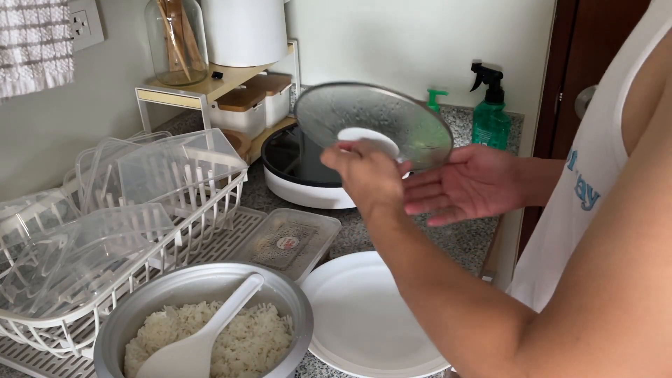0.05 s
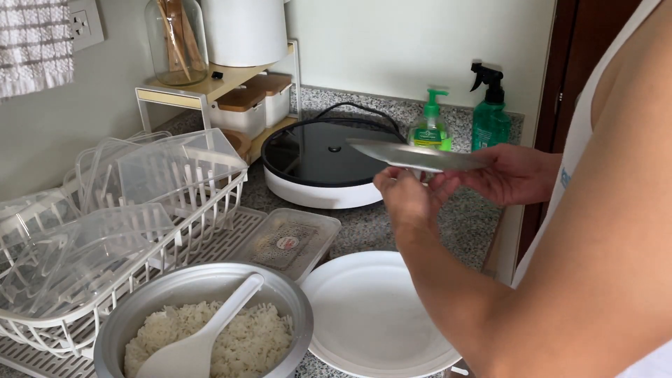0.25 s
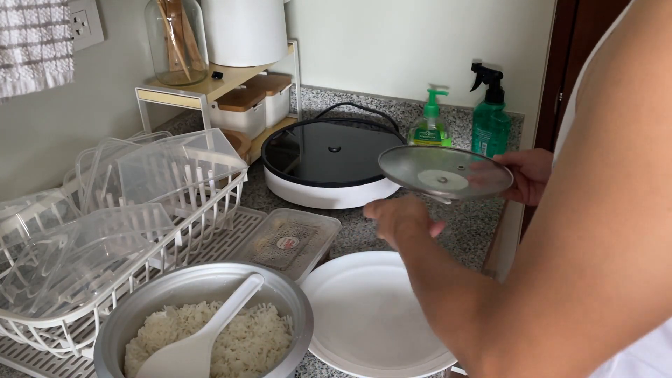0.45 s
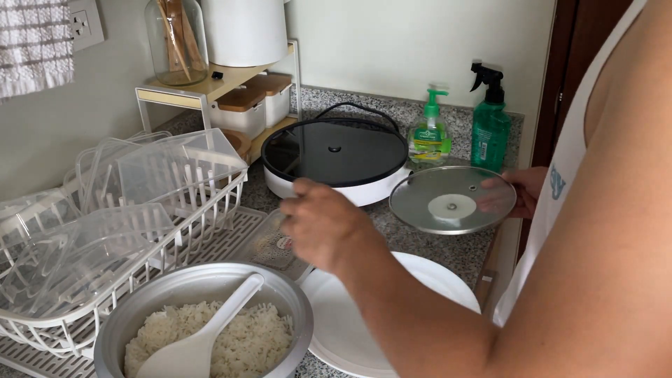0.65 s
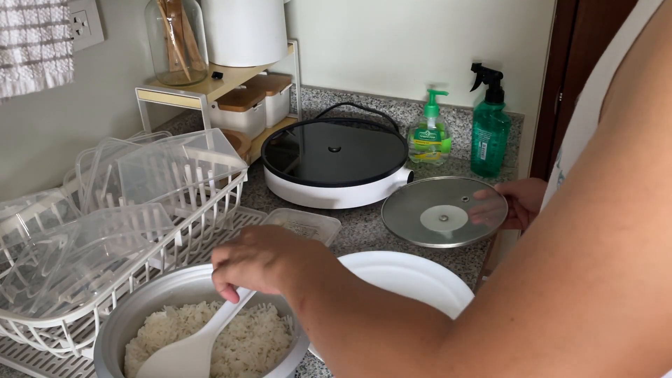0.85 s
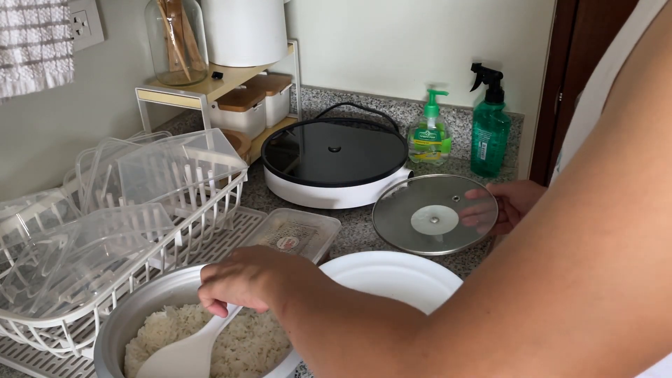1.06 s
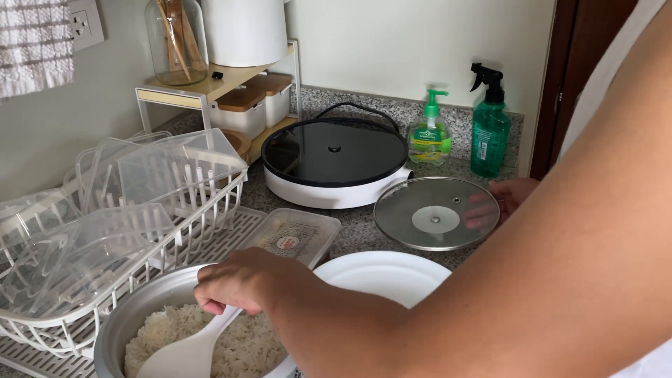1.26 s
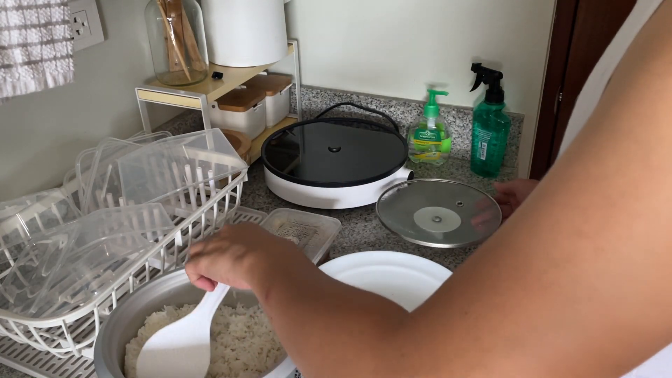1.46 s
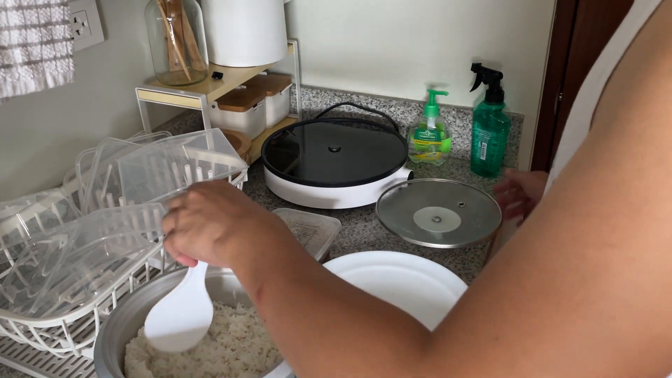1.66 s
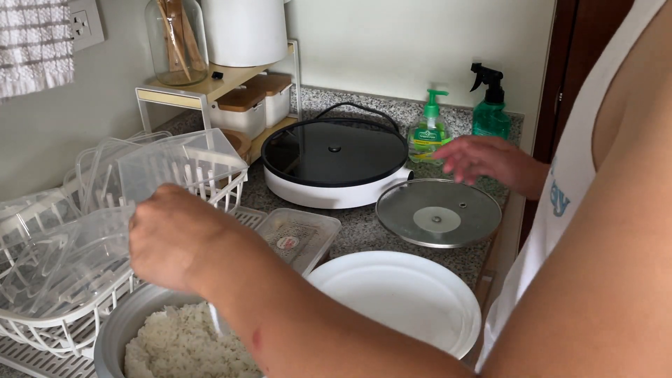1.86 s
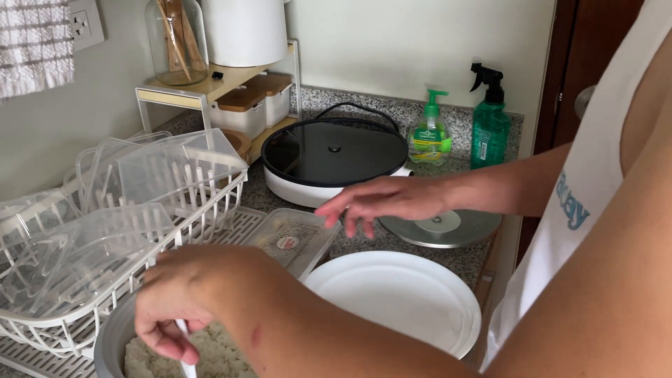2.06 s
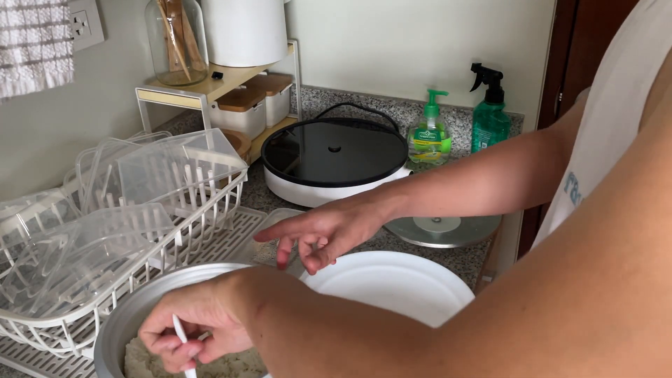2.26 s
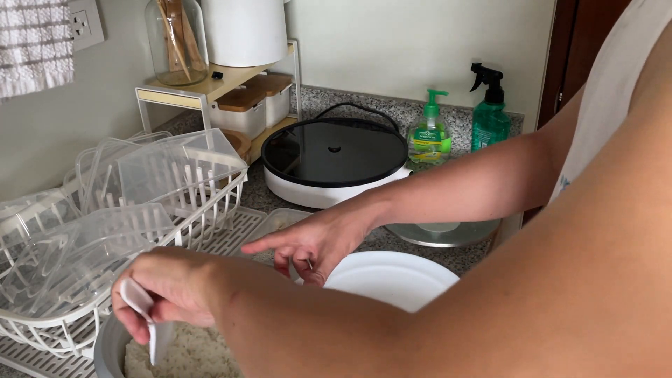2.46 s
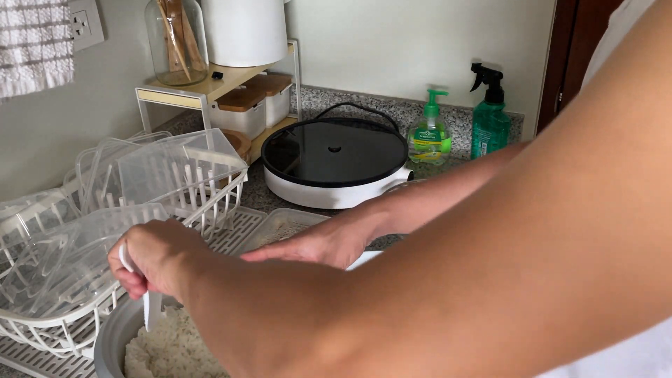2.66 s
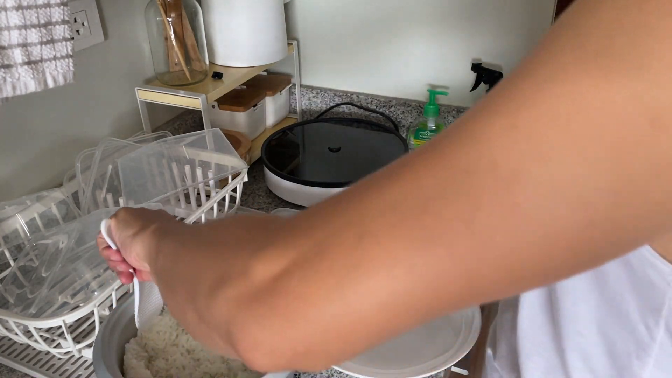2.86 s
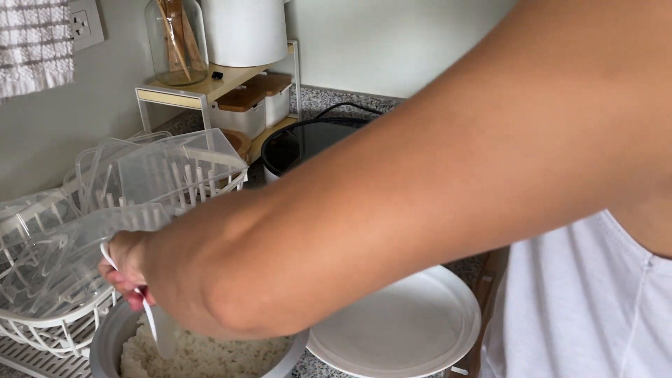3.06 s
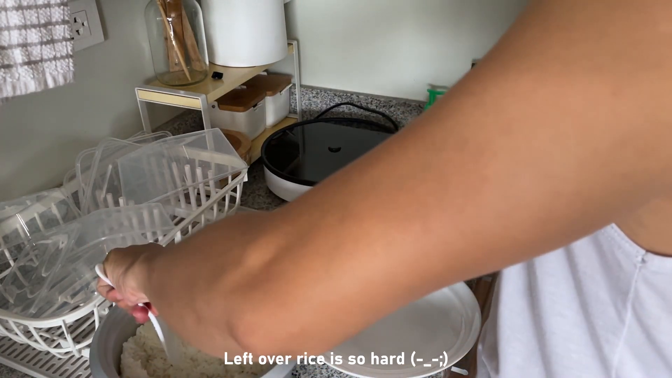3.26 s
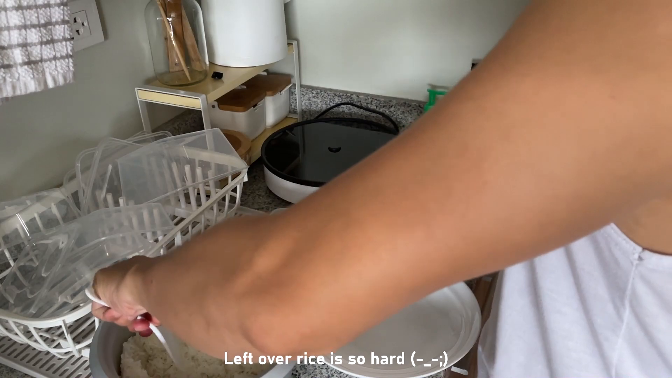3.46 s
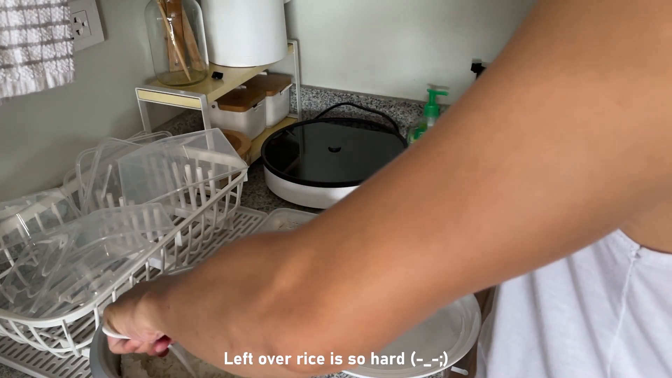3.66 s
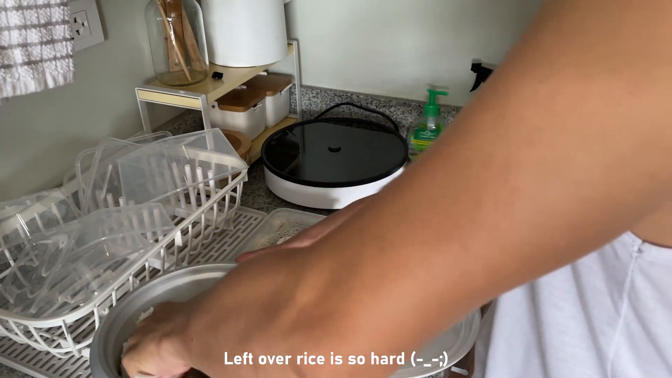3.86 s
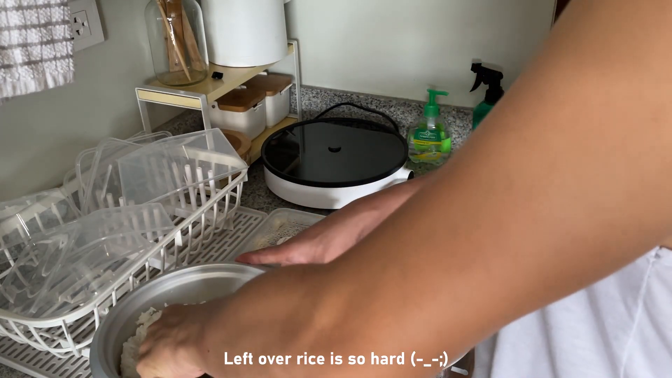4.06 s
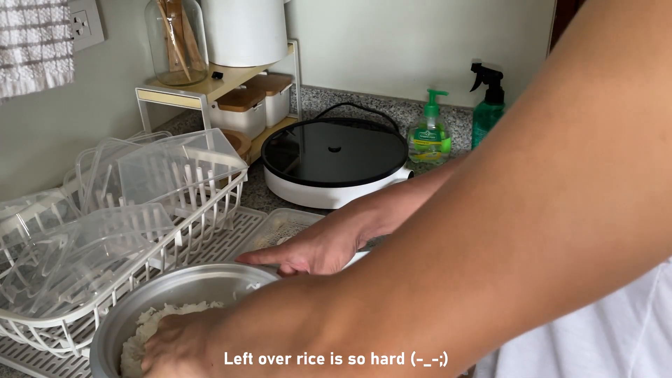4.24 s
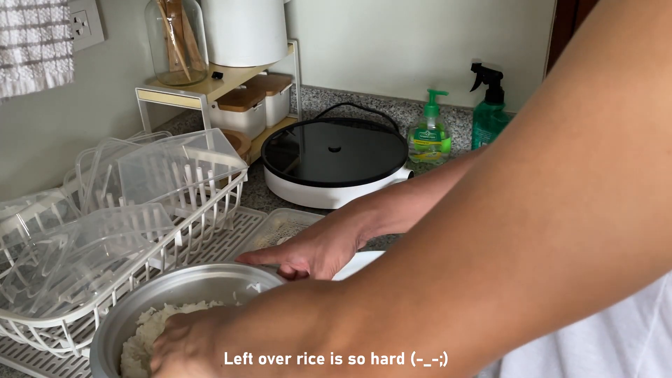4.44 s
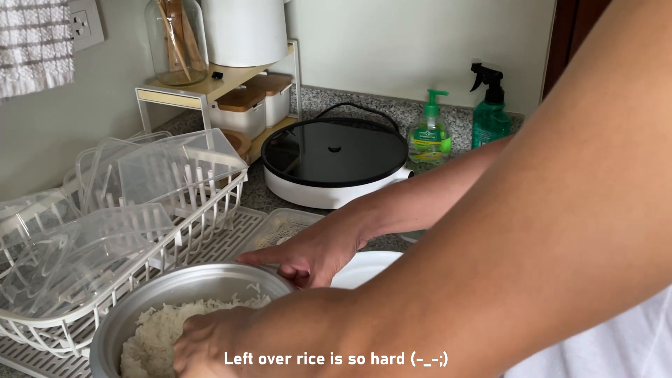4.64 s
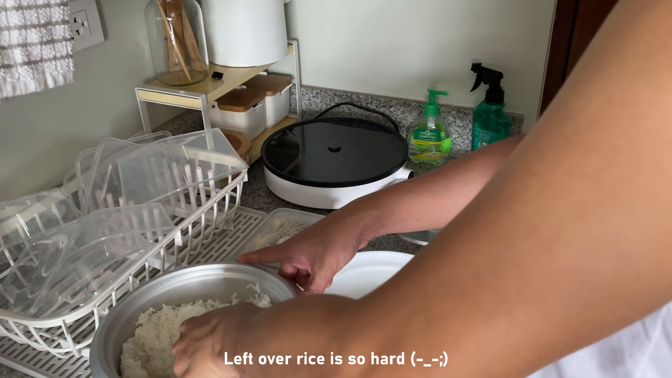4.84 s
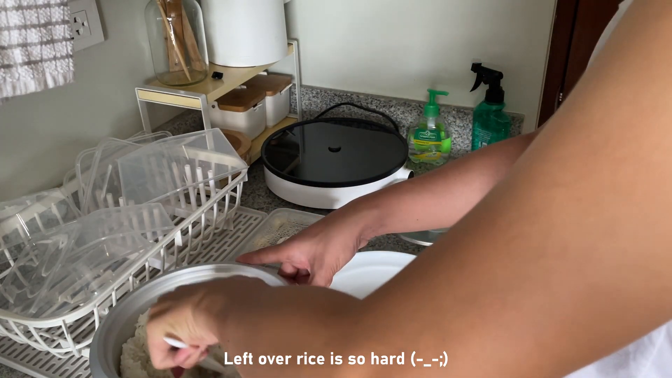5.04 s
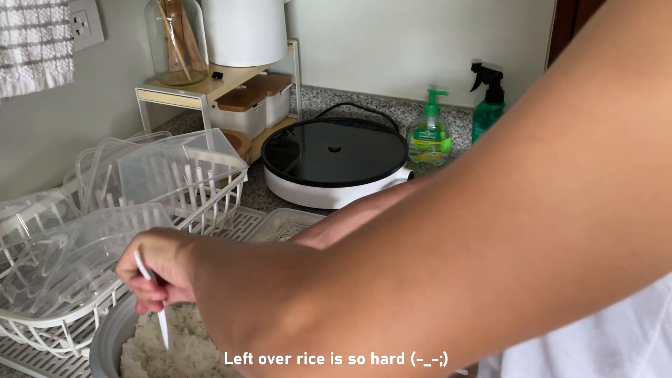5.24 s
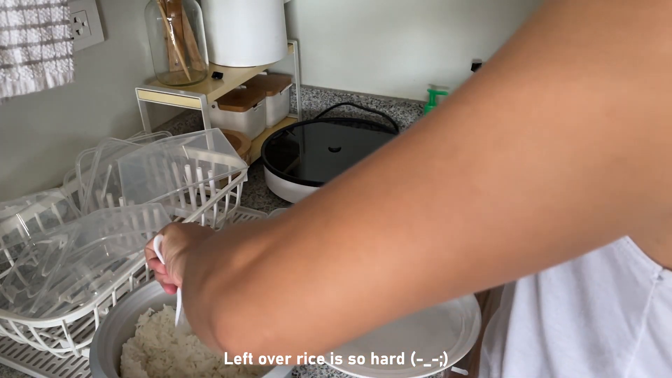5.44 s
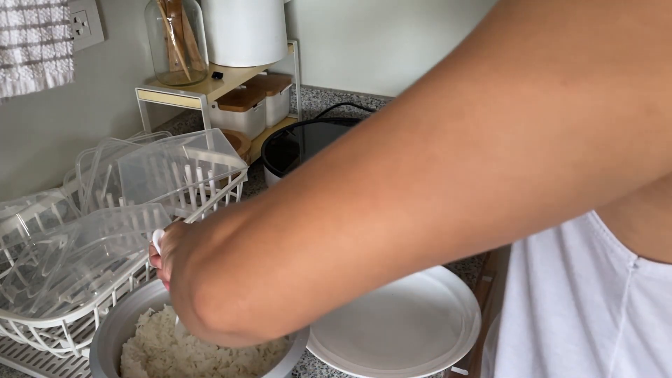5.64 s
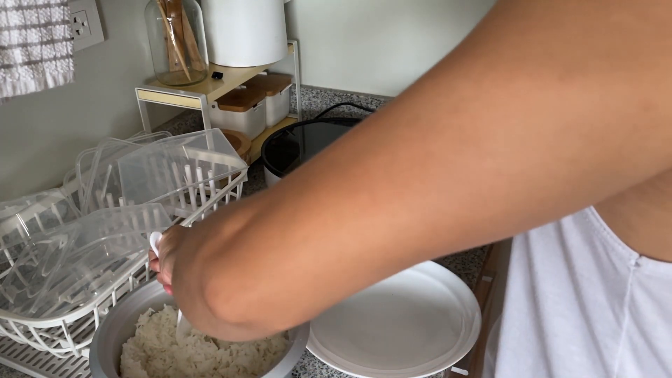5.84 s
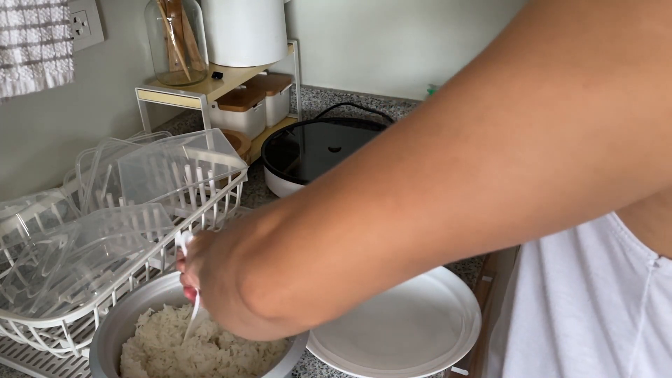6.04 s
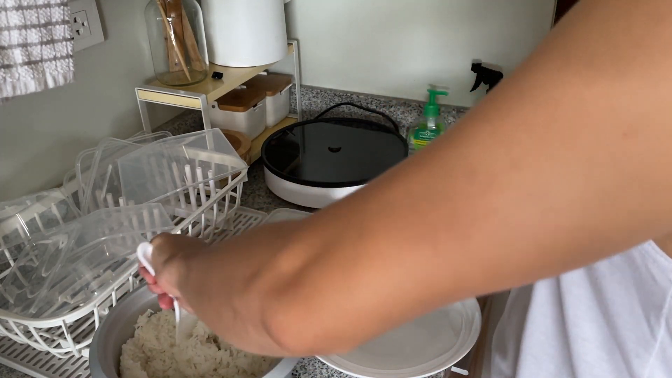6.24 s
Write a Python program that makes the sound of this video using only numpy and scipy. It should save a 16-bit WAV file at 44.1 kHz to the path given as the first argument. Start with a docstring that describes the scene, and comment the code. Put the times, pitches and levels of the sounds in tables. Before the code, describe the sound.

Small kitchen: lid clinks and rocks to rest, one hard ringing knock on a metal pot, then crackly digging through hard cooked rice with dull thuds.

```python
"""Rice pot and glass lid in a small kitchen

A glass pot lid slides through the fingers and is set down on its knob: filtered friction, clicks and ringing modes.
A plastic paddle knocks once, hard, on the metal rice pot: a chatter of noise bursts and the pot's modes.
It then digs and scrapes through stiff cooked rice: random slips, popping grains, snaps, thuds and a short groan.
Close walls answer nearly every sound, over a low steady background with faint thin tones."""
import sys
import numpy as np
from scipy import signal
from scipy.fft import rfft, irfft, next_fast_len
from scipy.io import wavfile
from scipy.ndimage import map_coordinates

SR = 44100
rng = np.random.default_rng(int(sys.argv[2]) if len(sys.argv) > 2 else 0)


def transcribe(u):
    """Save the signal u as a 16-bit wav file named by the first command-line argument.

    u: samples, shape (n,) or (channels, n), limited to [-1, 1]; the rate is SR.
    q: integer samples, one column per channel.
    """
    v = np.clip(np.atleast_2d(u).T, -1, 1)
    q = np.round(v * 32767).astype(np.int16)
    wavfile.write(sys.argv[1], SR, q)


N = 277830
NOW = np.arange(N) / SR  # s
AGE = np.arange(SR) / SR  # s since a blow

# Modes of the metal pot. Each row: frequency in Hz, relative level in dB, t60 in seconds.
POT_MODES = [(431, -14, .24), (489, -13, .25), (545, -14, .22), (619, -17, .4), (700, -12, .25),
             (740, -12, .25), (773, -3, .29), (794, -8, .28), (933, -14, .3), (953, -14, .28),
             (990, -12, .3), (1034, -21, .27), (1071, -20, .27), (1140, -16, .27), (1224, -14, .25),
             (1292, 1, .31), (1294, -39, 1.5), (1352, -9, .28), (1420, -15, .25), (1534, -18, .36),
             (1612, -19, .5), (1702, -5, .33), (1718, -14, .27), (1755, -13, .27), (1842, -13, .29),
             (1890, -10, .27), (2051, -17, .29), (2116, -18, .27), (2326, -14, .43), (2342, -20, .36),
             (2482, -19, .36), (2595, -11, .2), (2643, -19, .42), (2697, -15, .26), (2923, -22, .22),
             (3070, -22, .3), (3212, -19, .32), (3295, -24, .3), (4011, -26, .29), (4247, -26, .23),
             (4538, -29, .35), (4872, -24, .42), (4915, -26, .3), (5282, -20, .24), (5518, -29, .3),
             (6185, -30, .36), (6385, -28, .31), (7075, -27, .3)]
# Spectrum of a hard, sharp contact. Each row: frequency in Hz, relative level in dB.
EDGE_COLOUR = [(1200, -7.5), (2500, -4.5), (4300, -2), (6000, 2), (7400, -2.5), (10500, -6.5),
               (12500, -15.5), (15000, -28)]
# Dull spectrum of the pot moving on the counter. Each row: frequency in Hz, relative level in dB.
POT_MOVE_COLOUR = [(50, -16), (80, 0.5), (115, 6.5), (170, 0), (270, -4.5), (370, 2.5), (470, -9),
                   (800, -46.5)]


def amp(db):
    """Decibels to gain."""
    return 10 ** (np.asarray(db) / 20)


def unit(x):
    """Scaled to rms 1."""
    return x / np.sqrt(np.mean(x ** 2) + 1e-20)


def along(points, hz):
    """(Hz, value) points read on a log frequency axis."""
    f, v = np.transpose(points)
    return np.interp(np.log(hz + 1), np.log(f + 1), v)


def wobble(rate):
    """A smooth random curve, rate knots a second."""
    coarse = NOW[::32]
    knots = rng.standard_normal(int(N * rate / SR) + 4)
    return np.interp(NOW, coarse, map_coordinates(knots, [coarse * rate]))


def add(track, s, x):
    """Mix x into the track from time s."""
    part = track[..., round(s * SR):][..., :x.shape[-1]]
    part += x[..., :part.shape[-1]]


def filtered(x, response):
    """x times a response of frequency."""
    size = 2 * next_fast_len(x.shape[-1] // 2 + 4096)
    spectrum = rfft(x, size) * response(np.fft.rfftfreq(size, 1 / SR))
    return irfft(spectrum, size)[..., :x.shape[-1]]


def coloured(x, points):
    """Causal filter with the given spectrum; white noise keeps its power."""
    def response(hz):
        # folding the cepstrum forward gives minimum phase
        cepstrum = irfft(np.log(unit(amp(along(points, hz)))))
        cepstrum[1:len(hz) - 1] *= 2
        cepstrum[len(hz):] = 0
        return np.exp(rfft(cepstrum))
    return filtered(x, response)


def swells(rows):
    """Gain over time from (peak s, rise s, fall s, dB) rows: exponential rises and falls, whose powers add."""
    t = NOW[::16]
    power = 0
    for s, rise, fall, db in rows:
        decay = np.maximum((s - t) / rise, (t - s) / fall).clip(0, 40)
        power = power + (amp(db) * np.exp(-decay)) ** 2
    return np.interp(NOW, t, np.sqrt(power))


def crack(colour, t60):
    """One contact: a dying burst, flat before colouring, with the energy of 4 ms at rms 1."""
    t = AGE[:SR // 5]
    phases = np.angle(rfft(rng.standard_normal(len(t)) * amp(-60 * t / t60)))
    burst = coloured(irfft(np.exp(1j * phases))[:len(t) // 2], colour)
    return burst / np.linalg.norm(burst) * np.sqrt(.004 * SR)


def ring(modes):
    """Modes struck at slightly random strengths, each beating as it dies and out of phase left to right."""
    beat_db = 2
    out = 0
    for hz, db, t60 in modes:
        phase = rng.uniform(0, 2 * np.pi) + np.array([[.4], [-.4]]) * rng.choice([-1, 1])
        beat_hz = rng.uniform(5, 14)
        beat = beat_db * np.sin(2 * np.pi * (beat_hz * AGE + rng.random()))
        level = amp(db + .5 * rng.standard_normal() + beat - 60 * AGE / t60)
        out = out + level * np.sin(2 * np.pi * hz * AGE + phase)
    return out * (1 - np.exp(-AGE / 0.00043))  # soft onset


def grains(rate, spread_db, smooth):
    """Tiny slips at random moments and of uneven size, on a share of smooth friction noise."""
    sizes = amp(spread_db * np.clip(rng.standard_normal(N), -2, 2)) * rng.choice([-1, 1], N)
    slips = unit(sizes * (rng.random(N) < rate / SR))
    return unit(slips + smooth * rng.standard_normal(N))


def crumbs(rate, pitch_hz, scatter, cycles, spread_db):
    """Rice grains breaking at random moments, each a tiny pop with its own pitch and size."""
    count = int(rate * N / SR)
    draws = rng.standard_normal((count, 2))
    hz = np.clip(pitch_hz * np.exp(scatter * draws[:, :1]), 300, 14000)
    sizes = amp(spread_db * np.clip(draws[:, 1:], -2, 2)) * np.sqrt(hz)
    t = AGE[:SR // 120]
    pops = sizes * np.exp(-t * hz / cycles) * np.sin(2 * np.pi * hz * t)
    places = rng.integers(N, size=(count, 1)) + np.arange(len(t))
    return unit(np.bincount(places.ravel(), pops.ravel(), N)[:N])


def diffuse(pair):
    """Two unrelated signals become a diffuse field: alike in the bass, nearly unrelated in the middle,
    partly alike again in the treble."""
    # Left-right likeness of diffuse sound. Each row: frequency in Hz, correlation.
    likeness = [(60, 0.9), (150, 0.92), (300, 0.84), (700, 0.052), (1500, 0.042), (10000, 0.35)]

    def mix(hz):
        turn = np.arccos(np.clip(along(likeness, hz), -1, 1)) / 2
        return np.array([np.cos(turn), np.sin(turn)])
    mid, side = filtered(pair, mix)
    return np.array([mid + side, mid - side])


def kitchen(x, pan_db, near_db, tail_db):
    """Direct sound, quick echoes off the counter and crockery, and the tail of the walls."""
    # Decay of the walls. Each row: frequency in Hz, t60 in seconds.
    wall_decay = [(100, 0.87), (400, 0.5), (1500, 0.44), (5000, 0.31), (12000, 0.34)]
    noise = rng.standard_normal((2, SR // 2))
    t = AGE[:SR // 2]
    hz, frames, z = signal.stft(noise, SR, nperseg=256)
    dying = z * amp(-60 * frames / along(wall_decay, hz)[:, None])
    tail = signal.istft(dying, SR, nperseg=256)[1][:, :len(t)]
    tail = tail * np.clip(t / 0.0024 - .5, 0, 1)
    # sparse reflections
    near = rng.standard_normal(noise.shape) * (rng.random(noise.shape) < .03)
    near = near * (t > .001) * amp(-60 * t / 0.043)
    echoes = amp(near_db) * near / np.linalg.norm(near[0]) + amp(tail_db) * tail / np.linalg.norm(tail[0])
    wet = signal.fftconvolve(x[None], diffuse(echoes), axes=1)[:, :N]
    return x * amp([[pan_db / 2], [-pan_db / 2]]) + wet


def pot_wall(drive):
    """The pot's modes answering a drive of small blows or friction."""
    return signal.fftconvolve(drive[None], ring(POT_MODES), axes=1)[:, :N]


def digging():
    """The paddle shoves the pot, rubs along its wall in uneven slips and tears sticky grains apart."""
    # Paddle strokes. Each row: peak in seconds, rise in seconds, fall in seconds,
    # scrape level in dB, crackle level in dB.
    strokes = [(2.557, 0.0545, 0.041, -89, -69), (2.905, 0.025, 0.04, -66, -56),
               (3.098, 0.0099, 0.051, -53.5, -56.5), (3.15, 0.037, 0.025, -55, -55),
               (3.383, 0.035, 0.12, -69, -82), (3.681, 0.074, 0.022, -60.5, -63),
               (3.778, 0.042, 0.035, -55.5, -61.5), (3.905, 0.046, 0.024, -60, -60),
               (3.935, 0.021, 0.037, -53, -68), (3.974, 0.014, 0.033, -57.5, -65.5),
               (4.13, 0.15, 0.068, -65, -88), (4.385, 0.035, 0.025, -59, -75),
               (4.635, 0.13, 0.12, -61, -67.5), (4.775, 0.0091, 0.012, -77, -70),
               (5.154, 0.016, 0.015, -52, -81.5), (5.235, 0.014, 0.059, -64.5, -94.5),
               (5.57, 0.035, 0.037, -60.5, -65.5), (5.745, 0.094, 0.041, -64, -75),
               (5.96, 0.049, 0.085, -63.5, -71.5), (6.101, 0.017, 0.083, -61, -61.5),
               (6.158, 0.036, 0.012, -49.5, -60)]
    # The paddle shoves the whole pot. Each row: peak, rise and fall in seconds, level in dB.
    shoves = [(2.835, 0.014, 0.024, -52), (2.885, 0.041, 0.051, -45), (3.166, 0.04, 0.037, -43),
              (3.335, 0.0093, 0.05, -53), (4.415, 0.031, 0.018, -56.5), (5.58, 0.03, 0.071, -54),
              (6.17, 0.015, 0.043, -50)]
    # Jolts that shake the counter. Each row: peak, rise and fall in seconds, level in dB.
    jolts = [(.925, 0.0073, 0.052, -40), (1.17, 0.027, .06, -49.5), (2.11, 0.0069, 0.22, -59),
             (4.43, 0.028, 0.2, -48)]
    # Clumps of dry rice break apart. Each row: peak, rise and fall in seconds, level in dB.
    crunches = [(3.115, 0.018, 0.089, -61.5), (3.785, 0.0036, 0.022, -56), (3.907, 0.03, 0.027, -50),
                (4.774, 0.0039, 0.0045, -61), (5.168, 0.0098, 0.0094, -57.5), (5.237, .004, 0.013, -64.5),
                (6.11, 0.016, 0.028, -58)]
    # Spectra of the four textures. Each row: frequency in Hz, relative level in dB.
    rumble_colour = [(20, -45), (28, -18.5), (40, 9.5), (58, 5.5), (80, -7.5), (130, -20.5), (300, -56.5)]
    scrape_colour = [(200, -56), (450, -4.5), (630, 4.5), (770, 1), (920, -8.5), (1270, -1), (1550, -18),
                     (1950, -11), (2700, -17), (3800, -31), (6000, -56)]
    crackle_colour = [(1500, 6), (3000, 10.5), (4500, 8.5), (6500, 6), (8000, -1), (10000, -0.5),
                      (12500, -4.5), (14000, -56), (16000, -35)]
    crunch_colour = [(400, -32), (800, -7), (1300, 4), (1900, -3), (2600, 0.5), (3600, -3), (6000, -7),
                     (9000, -59)]

    rubbing = swells([(s, rise, fall, db) for s, rise, fall, db, _ in strokes])
    tearing = swells([(s, rise, fall, db) for s, rise, fall, _, db in strokes])
    # every stroke also pushes the pot a little
    shoving = np.hypot(swells(shoves), amp(-3.5) * rubbing)
    # between strokes the paddle stays in the rice and rubs lightly
    in_rice_s, resting_scrape_db, resting_crackle_db = 2.8, -73.5, -82.5
    in_rice = np.clip((NOW - in_rice_s) / .1, 0, 1)

    # the counter rumbles under the work, a little late and growing more slowly than the scrape
    rumble_db, growth_power, lag_s = -53.5, 0.5, 0.028
    keep = np.exp(-1 / (lag_s * SR))
    load = signal.lfilter([1 - keep], [1, -keep], np.hypot(rubbing, shoving))
    shaking = np.hypot(amp(rumble_db) * (load / load.max()) ** growth_power, swells(jolts))
    # fast and slow unevenness of the rubbing, in dB
    slips = amp(-0.5 * wobble(90) + 1.2 * wobble(35))

    rumble = shaking * unit(coloured(rng.standard_normal(N), rumble_colour))
    push = shoving * unit(coloured(grains(rate=790, spread_db=5.0, smooth=0.17), POT_MOVE_COLOUR))
    rub_gain = slips * np.hypot(rubbing, amp(resting_scrape_db) * in_rice)
    friction = rub_gain * grains(rate=450, spread_db=3.5, smooth=0.67)
    scrape = coloured(friction, scrape_colour)
    # the pot's wall rings along, 21 dB under the scrape
    wall = amp(-21) * scrape.std() * unit(pot_wall(friction))
    tear_gain = slips * np.hypot(tearing, amp(resting_crackle_db) * in_rice)
    crackle = coloured(tear_gain * grains(rate=350, spread_db=4, smooth=.55), crackle_colour)
    clumps = crumbs(rate=450, pitch_hz=1650, scatter=.55, cycles=3, spread_db=3)
    crunch = swells(crunches) * unit(coloured(clumps, crunch_colour))
    # loose grains pop under every stroke
    loose = amp(-8) * rubbing * crumbs(rate=130, pitch_hz=1250, scatter=.5, cycles=3.5, spread_db=4)
    low = kitchen(push, pan_db=1.0, near_db=-29.0, tail_db=-14.0)
    rice = kitchen(scrape + crackle + crunch + loose, pan_db=7.5, near_db=-1.5, tail_db=-3.5)
    return rumble + wall + low + rice


def ticks():
    """Hard grains snap or crumble: the stiff blade pings and taps the pot, which rings along faintly."""
    # The paddle's edge snapping through hard grains onto the pot. Each row: start in seconds,
    # ping level in dB, body level in dB, blade ping in Hz, top end lift in dB, burst t60 in seconds,
    # body pitch as a share of its usual pitch.
    snaps = [(2.421, -59, -58, 4410, 12.5, .06, 0.8), (2.824, -81, -59, 4250, 0, .04, 0.59),
             (2.8332, -65, -56, 4280, -2, 0.024, 0.8), (2.86, -47.5, -54.5, 4030, 2, 0.043, 0.88),
             (2.871, -60, -55, 5400, 4, 0.035, 0.74), (2.9038, -37.5, -48.5, 4160, 6.5, 0.029, 1),
             (2.916, -61, -60, 4500, -2, 0.044, 1.4), (3.0108, -38.5, -53.5, 5280, -8, 0.038, 2.2),
             (3.1015, -51, -52, 4560, 17, .04, 1), (3.1427, -41, -50.5, 4000, 0, 0.047, 1.04),
             (3.2658, -33, -64, 6340, -2, 0.026, 1), (3.324, -53, -47, 6160, 13, 0.059, 0.76),
             (3.636, -70, -59.5, 3630, 0, .04, 1.8), (3.665, -60, -51.5, 3560, 3, .025, 0.94),
             (3.681, -56, -48, 3560, -3, .04, 1.64), (3.749, -57, -58, 4170, -14, .025, 1.5),
             (3.755, -54, -52.5, 3770, -14, 0.046, 1.2), (3.779, -58, -54.5, 4800, -10, .04, 0.89),
             (3.858, -60, -65, 3500, -5, 0.033, 1.1), (3.902, -64, -53, 3300, -3, 0.03, 1.8),
             (4.198, -74, -56, 4200, -2, .03, 1.16), (4.2869, -63.5, -53.5, 5540, -15.5, 0.039, 0.59),
             (4.372, -32.5, -41.5, 5440, -5.5, 0.024, 1), (4.3741, -36, -57, 4720, -13, 0.035, 1.16),
             (4.385, -44.5, -49, 5100, -15, 0.15, 0.78), (4.528, -65, -57.5, 4330, -1, 0.025, 1),
             (4.6296, -52, -50, 3870, -12, 0.064, 0.89), (4.6725, -41.5, -51, 5800, 2, 0.03, 0.86),
             (4.722, -52.5, -55.5, 5030, 2, .03, 1.05), (4.772, -70, -51, 4000, 0, 0.034, 1.17),
             (4.8813, -47.5, -54, 4850, 5, 0.054, 0.98), (5.038, -70, -55.5, 4900, -16, .03, 0.82),
             (5.144, -51, -46, 3530, -27, 0.07, 1.4), (5.233, -76, -57, 3440, -10, .05, 1.4),
             (5.539, -56, -60, 4800, 3, 0.034, 0.86), (5.5621, -61, -46.5, 4000, 4, 0.026, 1.13),
             (5.767, -52.5, -52, 4100, 0, 0.043, 0.69), (5.9, -77, -58, 4160, -4, 0.035, 1.07),
             (5.935, -64, -54, 5130, 9, 0.037, 0.96), (5.983, -63, -58, 3900, 4, .04, 1.2),
             (6.076, -61, -51, 4260, 12, 0.022, 0.95), (6.1408, -44.5, -43, 4940, -2, 0.026, 0.91),
             (6.15, -56, -50, 4270, 9, 0.018, 0.57), (6.1671, -57, -43.5, 4560, 13, 0.021, 0.76)]
    # Body of the tap at its usual pitch. Each row: frequency in Hz, relative level in dB.
    body_colour = [(150, 18), (400, 10.5), (700, 21), (1300, 13), (2300, 6), (3500, 2.5), (6000, -64)]
    snap_per_ping_db, ring_per_body_db = -9.5, -21  # broad snap around a ping; faint pot ring after a tap
    ping_per_burst, top_end_hz = .22, 8000  # share of the burst's t60; where the lift starts
    taps, blows = np.zeros(N), np.zeros(N)
    t = AGE[:SR // 20]
    for s, ping_db, body_db, ping_hz, top_db, burst, pitch in snaps:
        ping = amp(ping_db - 60 * t / (ping_per_burst * burst)) * np.sin(2 * np.pi * ping_hz * t)
        add(taps, s + .001, ping)
        snap = crack([(hz, db + top_db * (hz > top_end_hz)) for hz, db in EDGE_COLOUR], t60=burst)
        body = crack([(hz * pitch, db) for hz, db in body_colour], t60=burst)
        add(taps, s, amp(ping_db + snap_per_ping_db) * snap + amp(body_db) * body)
        add(blows, s, amp([body_db + ring_per_body_db]))
    return pot_wall(blows) + kitchen(taps, pan_db=4.5, near_db=-5.0, tail_db=-5.0)


def groan():
    """Pressed hard, the paddle sticks and slips along the pot's wall in a nearly regular train."""
    # Short groans. Each row: peak in seconds, rise in seconds, fall in seconds, level in dB.
    presses = [(3.934, 0.03, 0.022, -43), (3.974, 0.014, 0.021, -47.5), (4.62, 0.13, 0.051, -63)]
    # Voice of the groan. Each row: frequency in Hz, relative level in dB.
    groan_colour = [(250, -39), (600, 1.5), (780, 1), (1280, -5.5), (1950, -8), (2800, -36), (5000, -42)]
    slip_hz, wander, jitter = 633, .06, .09  # slips a second; shares of that rate, slow and fast
    rate = slip_hz * np.exp(wander * wobble(60) + jitter * wobble(600))
    slips = np.diff(np.floor(np.cumsum(rate) / SR), prepend=0) * amp(1.6 * wobble(300))
    voice = unit(coloured(slips - slips.mean(), groan_colour))
    return kitchen(swells(presses) * voice, pan_db=1.5, near_db=-2.5, tail_db=-9.0)


def knock():
    """The paddle strikes the pot, chatters for a hundredth of a second and leaves the wall ringing."""
    # Contacts of the one knock. Each row: start in seconds, level in dB, sharp edge level in dB.
    contacts = [(2.0842, -27.5, -35), (2.0871, -16.5, -41), (2.0895, -21, -38.5), (2.094, -36, -48.5)]
    # Spectra of the blow and of the wash. Each row: frequency in Hz, relative level in dB.
    knock_colour = [(150, -21), (300, -22), (390, -5), (520, -1), (780, -10.5), (1000, 1), (1350, -7.5),
                    (1530, -6), (1850, -1.5), (2700, -12), (3600, -19.5), (5300, -17), (7000, -25),
                    (11000, -29), (16000, -42.5)]
    wash_colour = [(150, -20.5), (300, -14.5), (400, -3), (520, -6), (750, -3), (1000, -2), (1400, -6),
                   (1850, -2.5), (2600, -6.5), (3600, -13), (5300, -11.5), (6400, -17.5), (7200, -20),
                   (11000, -29), (16000, -46)]
    ring_db, wash_db, wash_t60_s = -23.5, -31.5, 0.45
    blows, wall = np.zeros(N), np.zeros((2, N))
    for s, db, edge_db in contacts:
        add(blows, s, amp(db) * crack(knock_colour, t60=0.0085))
        add(blows, s, amp(edge_db) * crack(EDGE_COLOUR, t60=0.014))
    # under the clear modes, countless weak ones blend with the room into a dying wash
    wash = unit(coloured(diffuse(rng.standard_normal((2, SR))), wash_colour))
    wash = wash * amp(wash_db - 60 * AGE / wash_t60_s) * (1 - np.exp(-AGE / 0.0086))
    # the second contact, the loudest, sets the wall ringing
    add(wall, contacts[1][0], amp(ring_db) * ring(POT_MODES) + wash)
    return wall + kitchen(blows, pan_db=4.5, near_db=-2.0, tail_db=-13.5)


def bumps():
    """The pot tips a little as the paddle digs in and drops back on the counter with dull thuds."""
    # Drops of the pot. Each row: start in seconds, level in dB.
    drops = [(2.865, -42.5), (2.889, -50), (3.145, -38.5), (3.168, -40.5), (3.196, -44)]
    thuds = np.zeros(N)
    for s, db in drops:
        add(thuds, s, amp(db) * crack(POT_MOVE_COLOUR, t60=0.031))
    return kitchen(thuds, pan_db=5.5, near_db=-12, tail_db=-14)


def lid():
    """Each touch clicks, rings the rim and thumps the knob, with its own lift or cut in the upper rim."""
    # The lid touching down and rattling to rest. Each row: touch in seconds, click level in dB,
    # sharp edge level in dB, rim ring level in dB, thump drive in dB, softness in seconds, upper rim lift in dB.
    touches = [(0.9005, -34.5, -45.5, -39, -20, 0.003, 18),
               (1.0266, -27, -60.5, -42.5, -25.5, 0.00063, 5.5),
               (1.0332, -38.5, -71, -53, -22, 0.0015, 7.5), (1.0413, -43, -69, -53.5, -23, 0.0021, -2),
               (1.0651, -32, -61.5, -51, -24.5, 0.00058, -4),
               (1.083, -39.5, -73.5, -53.5, -20, 0.00153, -3), (1.108, -47.5, -73, -63, -36, 0.002, -5),
               (1.231, -71, -84, -74, -46, 0.0022, 3.5)]
    # Click of glass and rim. Each row: frequency in Hz, relative level in dB.
    click_colour = [(300, 15), (800, 6.5), (1700, -5), (2150, -1), (2550, 2.5), (2950, 12.5), (3230, 6.5),
                    (3420, -7.5), (3750, -18), (4150, -20), (4500, -8.5), (4800, -15.5), (5500, -21.5),
                    (5950, -13.5), (6300, -19.5), (6850, -12.5), (7300, -16), (9000, -45), (11000, -31),
                    (15000, -58)]
    # Modes of the free rim. Each row: frequency in Hz, relative level in dB, t60 in seconds.
    rim_modes = [(2170, -14, .2), (2390, -14, .36), (2610, -11, .25), (2720, -10, .25), (2810, -9, .22),
                 (2923, -3, .3), (3031, -5, .32), (3155, -5, .36), (3215, -1, .3), (3865, -22, .22),
                 (4480, -21, .3), (4872, -35, .9)]
    # Modes of the knob and glass on the counter. Each row: frequency in Hz, relative level in dB, t60 in seconds.
    knob_modes = [(181.3, -5, 0.15), (233, -11.5, 0.2), (284.8, 0.5, 0.14), (409, -8, 0.13),
                  (441, -15.5, 0.17), (486, -7.5, 0.09), (774, -9.5, 0.088), (870, -22.5, 0.3),
                  (1030, -14, 0.077), (1184, -22.5, 0.35)]
    rim_held = 0.69  # share of the rim's ring time left while the hand is on it
    lag_per_softness = 2.875  # a softer landing takes longer to load the knob
    rest_s = 1.16  # the hand stops the rocking: low sounds drop by 4 dB
    clicks, thumps, rim = np.zeros(N), np.zeros(N), np.zeros((2, N))
    hz, db, t60 = np.transpose(knob_modes)[..., None]
    # each mode takes a cycle or two to build up
    modes = amp(db - 60 * AGE / t60) * (1 - np.exp(-AGE * hz / 2.0)) * np.sin(2 * np.pi * hz * AGE)
    for s, click_db, edge_db, ring_db, thump_db, softness, upper_db in touches:
        lift = lambda f: upper_db * (3350 < f < 4050)
        click = crack([(f, level + lift(f)) for f, level in click_colour], t60=0.072)
        add(clicks, s, amp(click_db) * click + amp(edge_db) * crack(EDGE_COLOUR, t60=0.0055))
        held_modes = [(f, level + lift(f), life * rim_held) for f, level, life in rim_modes]
        add(rim, s, amp(ring_db) * ring(held_modes))
        # a soft touch favours the lowest modes
        thump = np.sum(modes / (1 + (hz * softness) ** 2), axis=0)
        add(thumps, s + lag_per_softness * softness, amp(thump_db) * thump)
    held = amp(np.interp(NOW, [rest_s, rest_s + .03], [0, -4]))
    low = kitchen((thumps + rocking()) * held, pan_db=2.5, near_db=-19.5, tail_db=-16.5)
    return rim + low + kitchen(clicks, pan_db=2.5, near_db=-4.0, tail_db=-2.5)


def rocking():
    """The lid rocks on its knob ever faster as the weight settles: a low boom that rises in pitch."""
    # Rocking after two landings. Each row: landing in seconds, peak in seconds, rise in seconds,
    # fall in seconds, level in dB before the hand stills it.
    rocks = [(0.904, 0.95, 0.032, 0.03, -28), (1.028, 1.145, 0.098, 0.024, -25)]
    start_hz, end_hz, settle_s = 50.2, 113.8, 0.0316
    hz = end_hz + (start_hz - end_hz) * np.exp(-AGE / settle_s)
    boom = np.zeros(N)
    for landing, peak, rise, fall, db in rocks:
        past = landing + AGE - peak
        swell = np.exp(-np.maximum(-past / rise, past / fall)) * (1 - np.exp(-AGE / 0.0066))
        add(boom, landing, amp(db) * swell * np.sin(2 * np.pi * np.cumsum(hz) / SR))
    return boom


def fingers():
    """Skin drags over the steel rim and slips off with a short bright scuff that sets it ringing."""
    # Fingers sliding on the rim. Each row: peak in seconds, rise in seconds, fall in seconds,
    # bright scuff level in dB, dull drag level in dB.
    slides = [(.305, 0.028, 0.044, -76, -63.5), (0.413, 0.0043, 0.0055, -39, -60),
              (0.448, 0.029, 0.03, -56.5, -55)]
    # Spectra of scuff and drag. Each row: frequency in Hz, relative level in dB.
    scuff_colour = [(1000, -22), (1700, -24), (3100, -13), (4300, -2), (5100, 5), (6000, -9.5),
                    (7300, -14.5), (11500, -21.5), (14000, -45)]
    drag_colour = [(1200, -20.5), (2200, -5), (3200, 1), (4200, -1), (5200, -6), (7000, -14),
                   (12000, -23.5)]
    # The rim's thin upper ring. Each row: frequency in Hz, relative level in dB, t60 in seconds.
    flick_modes = [(3036, -9, .27), (3235, -9, .3), (3849, -11, .33), (4370, -6, .25), (4877, -2, .26),
                   (5025, 0, .33), (5270, -9, .25), (5480, -7, .24), (5749, -9, .26)]
    flick_s, flick_db = .409, -50.5  # the finger slips off the rim
    scuff = unit(coloured(grains(rate=3100, spread_db=-0.5, smooth=0.39), scuff_colour))
    scuff = scuff * swells([(s, rise, fall, db) for s, rise, fall, db, _ in slides])
    drag = unit(coloured(grains(rate=2100, spread_db=5.0, smooth=0.64), drag_colour))
    drag = drag * swells([(s, rise, fall, db) for s, rise, fall, _, db in slides])
    rim = np.zeros((2, N))
    add(rim, flick_s, amp(flick_db) * ring(flick_modes))
    return rim + kitchen(scuff + drag, pan_db=4.0, near_db=-2, tail_db=-6.5)


def singing():
    """Faint thin tones swell, waver in level and pitch, and fade in the background."""
    # Thin tones. Each row: peak in seconds, rise in seconds, fall in seconds, pitch in Hz, level in dB.
    tones = [(1.55, 0.093, 0.081, 1630, -76), (1.6, 0.2, 0.44, 2040, -81), (1.98, 0.17, 0.26, 2253, -80),
             (2.441, .07, 0.11, 2206, -73), (2.51, 0.0405, 0.046, 3220, -75.5), (5.55, .6, 1, 2230, -75.5),
             (5.4, 0.68, 0.45, 3370, -80.5)]
    out = 0
    for s, rise, fall, hz, db in tones:
        level = swells([(s, rise, fall, db)]) * amp(3 * wobble(20))
        out = out + level * np.sin(2 * np.pi * hz * NOW + 1.2 * wobble(30))
    return out


def background():
    """A low, steady indoor rumble with a trace of hiss: diffuse noise."""
    # Spectrum of the room at rest. Each row: frequency in Hz, relative level in dB.
    air_colour = [(13, -54), (22, -26.5), (109, -2.5), (140, -11), (229, -6), (263, -18), (387, -17.5),
                  (482, -22.5), (750, -20), (910, -33), (1860, -40), (2260, -34.5), (2450, -40),
                  (3600, -45), (4400, -36.5), (5200, -38.5), (5600, -42.5), (6800, -47), (16000, -68.5)]
    level_db = -57.5
    air = unit(coloured(diffuse(rng.standard_normal((2, N))), air_colour))
    return amp(level_db + 0.4 * wobble(10.0)) * air * amp([[.5], [-.5]])


def scene():
    """All the kitchen's sounds together."""
    work = fingers() + lid() + knock() + digging() + bumps() + groan() + ticks()
    return work + singing() + background()


def record(dry):
    """Two microphone ports roll off the bass, notch and skew the treble; a steep band limit follows."""
    # Response of the ports. Each row: frequency in Hz, gain in dB.
    port_gain = [(20, -23), (28, -9), (36, 0.5), (6800, -0.5), (7500, -2), (8200, -14.5), (9000, -1.5),
                 (10000, -4.5), (13000, 4), (14500, -6.5)]
    # Phase between the ports. Each row: frequency in Hz, lead of the left port in radians.
    port_lead = [(30, 0), (250, 0.34), (700, 1.04), (1030, 1.07), (1290, 0.92), (2450, 0.77), (3880, 0.65),
                 (5340, .5), (6890, -0.7), (7670, -7), (9200, -3), (10600, -6.5), (12900, -13),
                 (13800, -9.5)]
    top_hz = 16000
    halves = np.array([[.5], [-.5]])
    ports = filtered(dry, lambda hz: amp(along(port_gain, hz)) * np.exp(1j * along(port_lead, hz) * halves))
    return filtered(ports, lambda hz: 1 / np.sqrt(1 + (hz / top_hz) ** 80))


dry = scene()
out = record(dry)
transcribe(out)
```